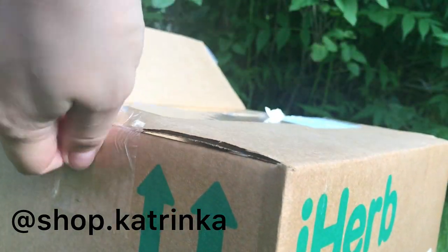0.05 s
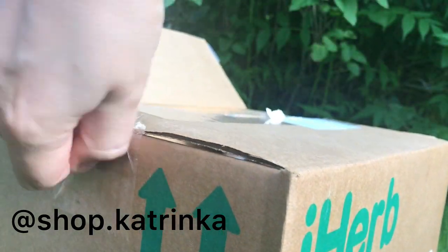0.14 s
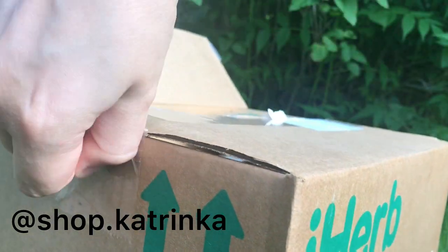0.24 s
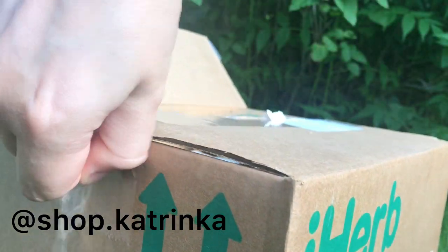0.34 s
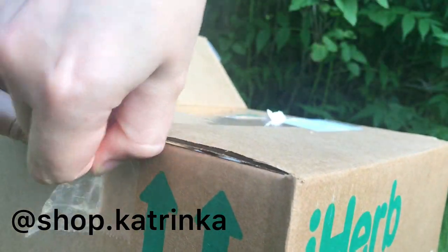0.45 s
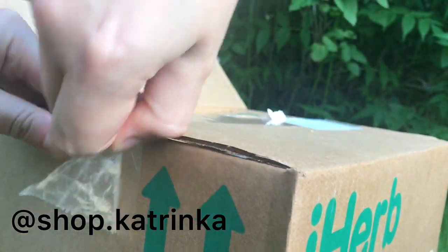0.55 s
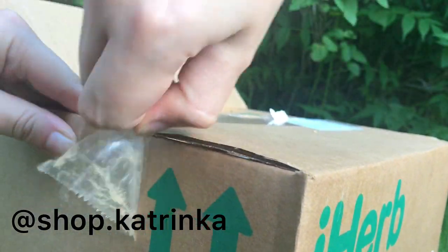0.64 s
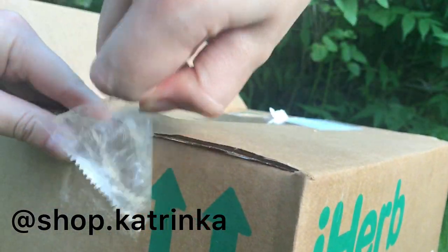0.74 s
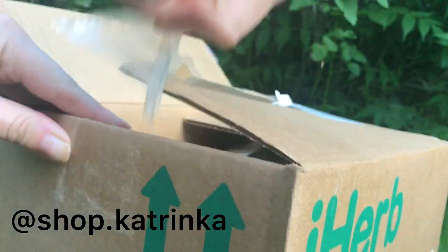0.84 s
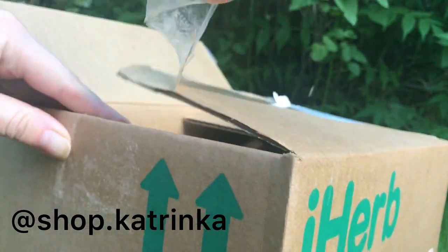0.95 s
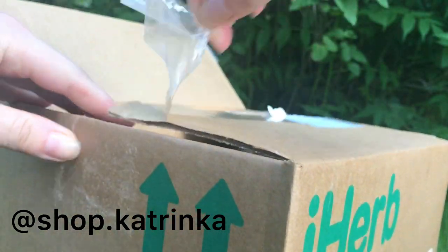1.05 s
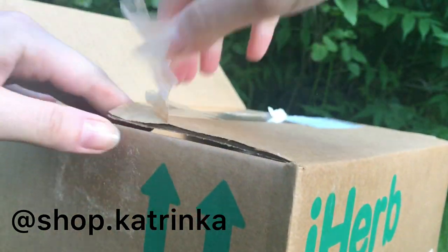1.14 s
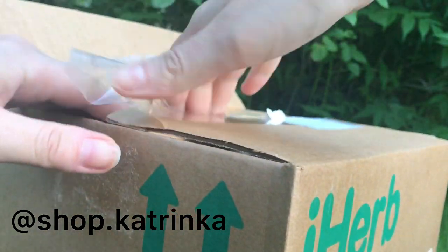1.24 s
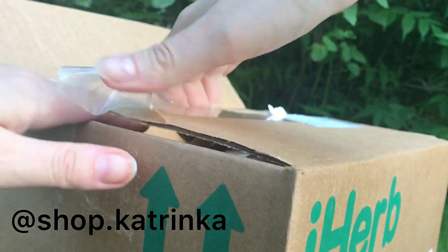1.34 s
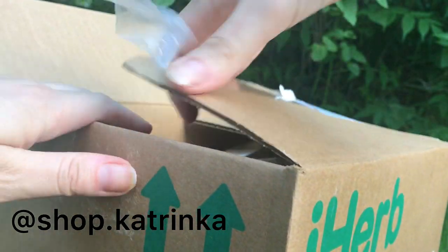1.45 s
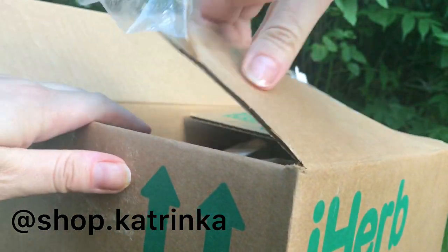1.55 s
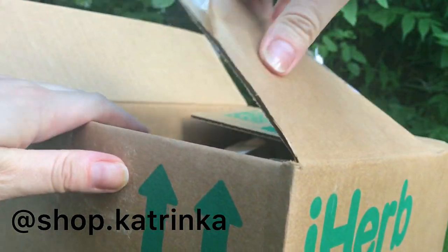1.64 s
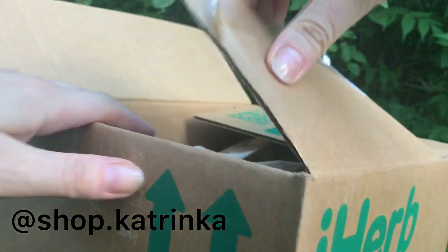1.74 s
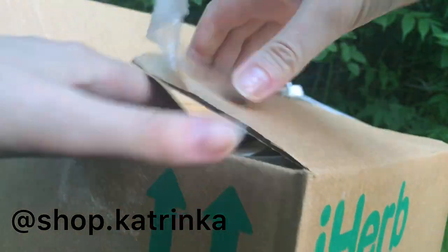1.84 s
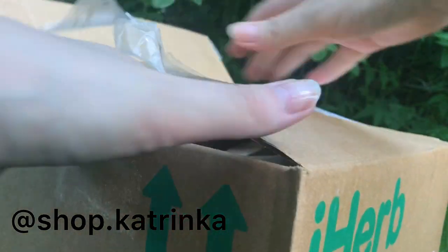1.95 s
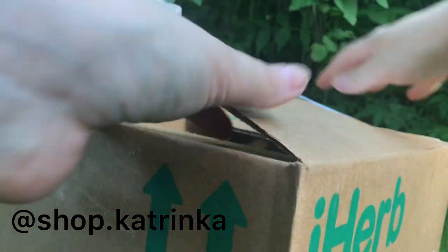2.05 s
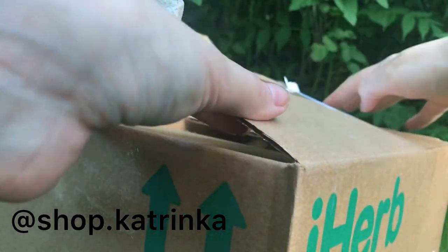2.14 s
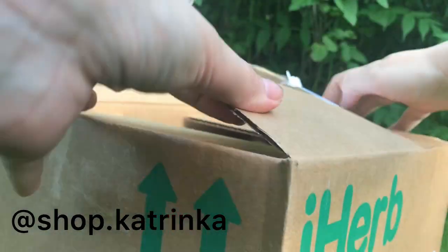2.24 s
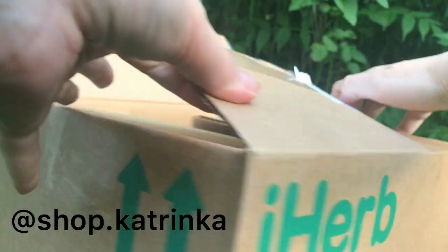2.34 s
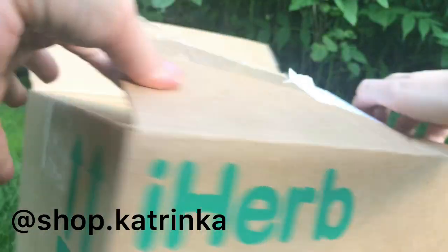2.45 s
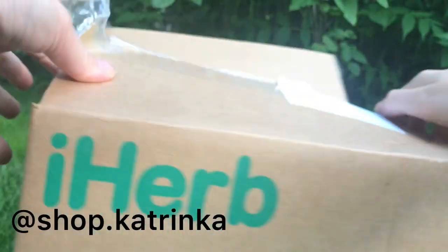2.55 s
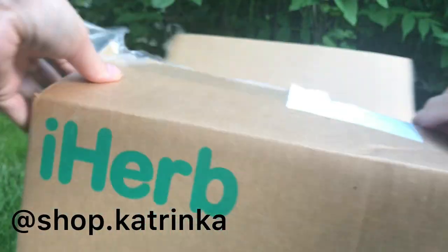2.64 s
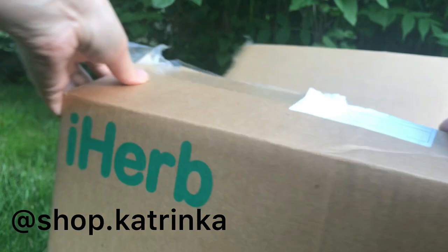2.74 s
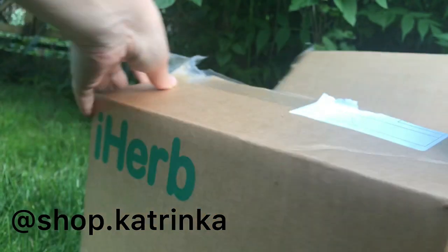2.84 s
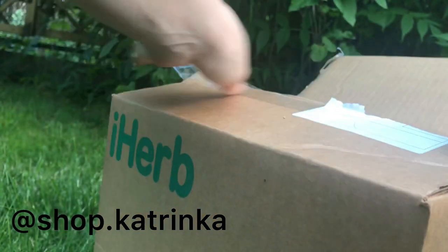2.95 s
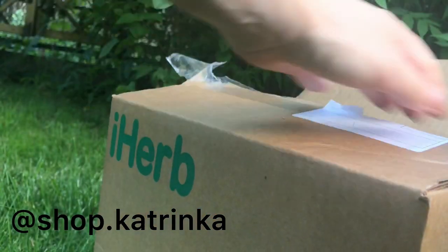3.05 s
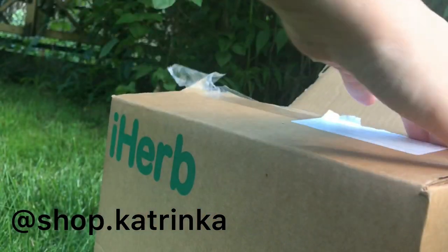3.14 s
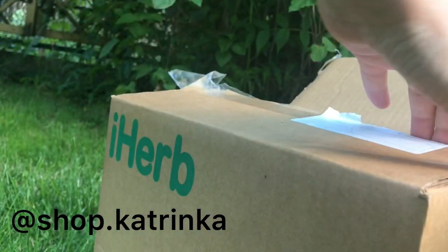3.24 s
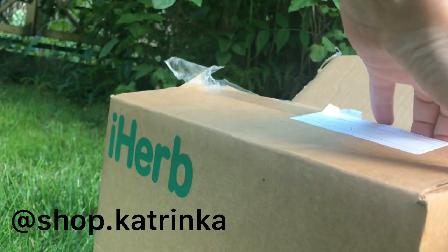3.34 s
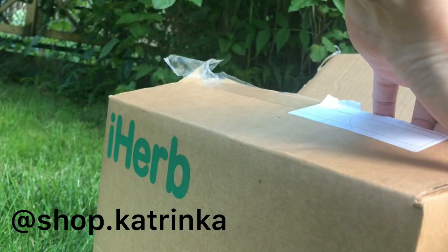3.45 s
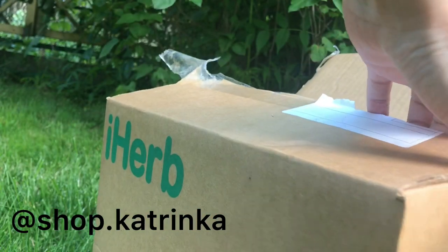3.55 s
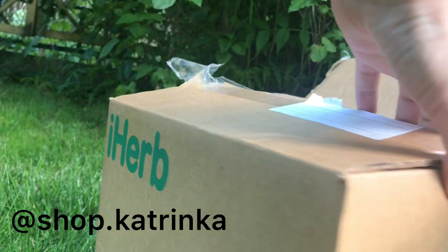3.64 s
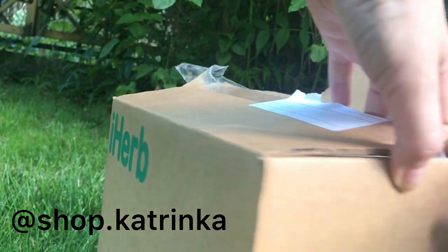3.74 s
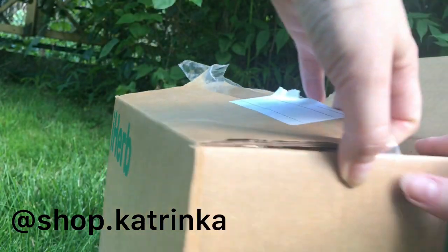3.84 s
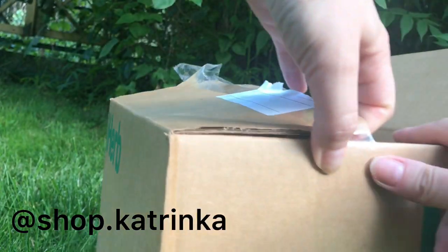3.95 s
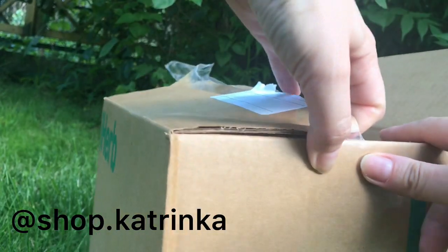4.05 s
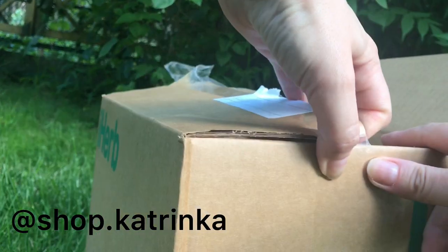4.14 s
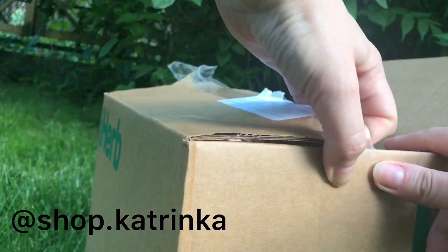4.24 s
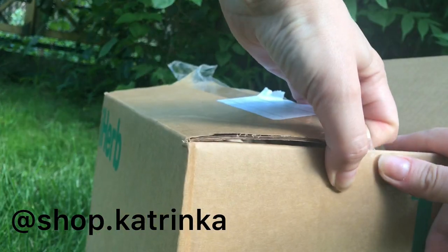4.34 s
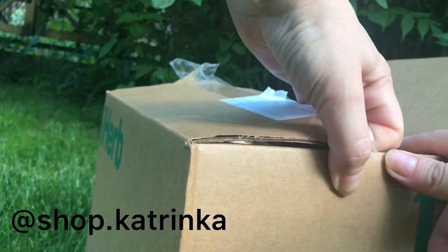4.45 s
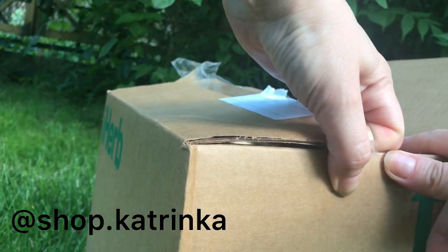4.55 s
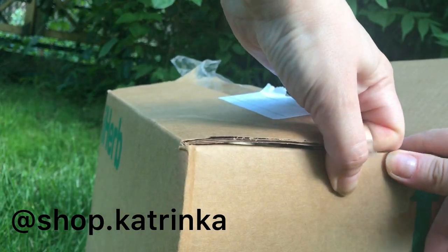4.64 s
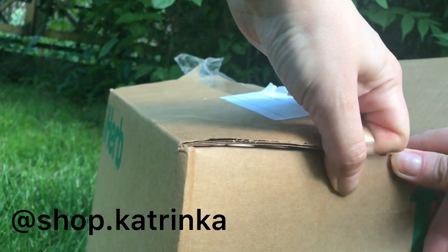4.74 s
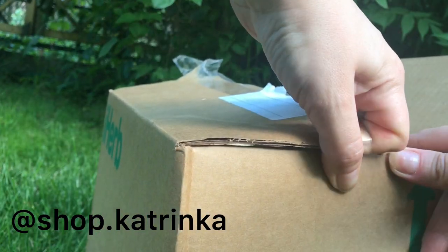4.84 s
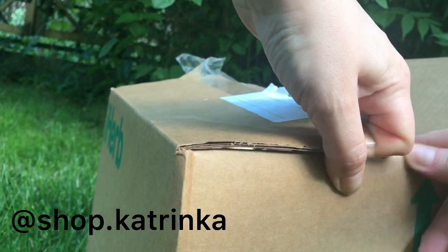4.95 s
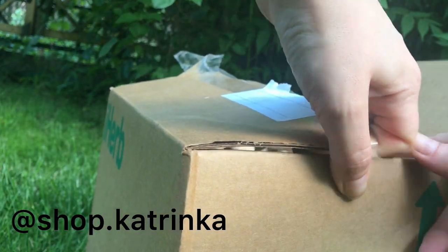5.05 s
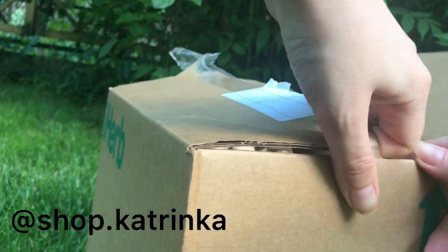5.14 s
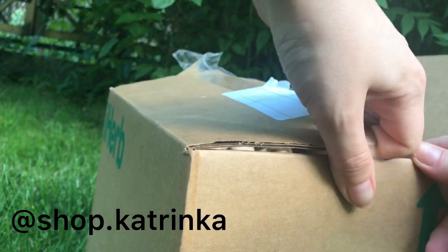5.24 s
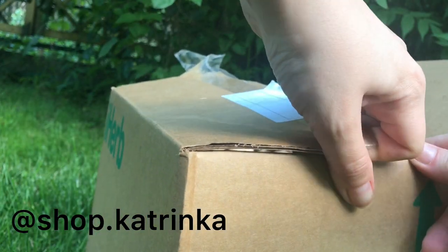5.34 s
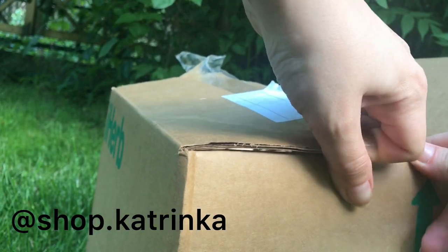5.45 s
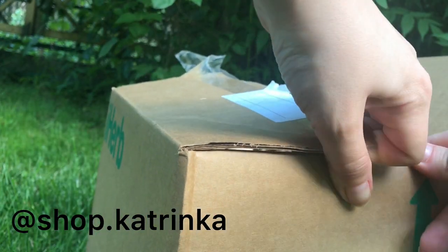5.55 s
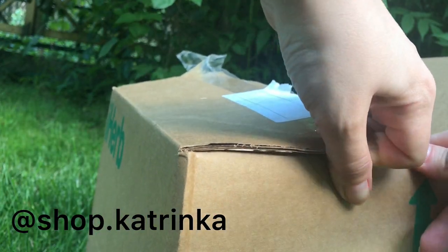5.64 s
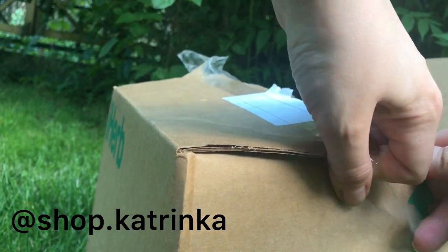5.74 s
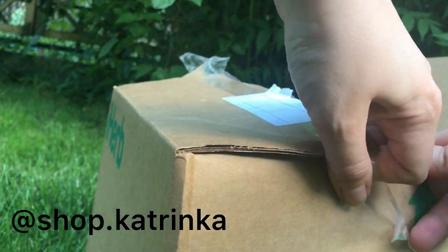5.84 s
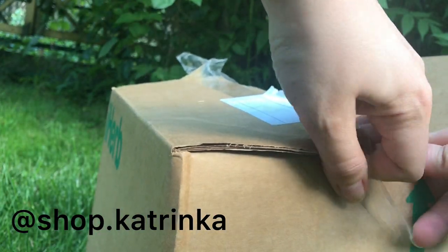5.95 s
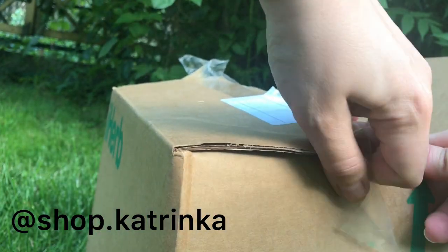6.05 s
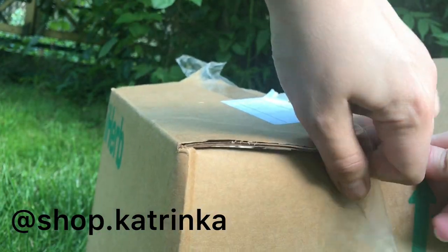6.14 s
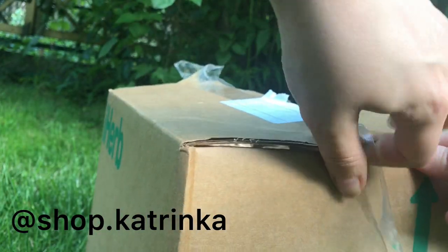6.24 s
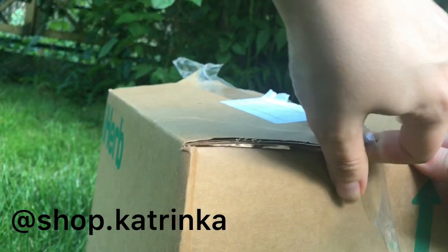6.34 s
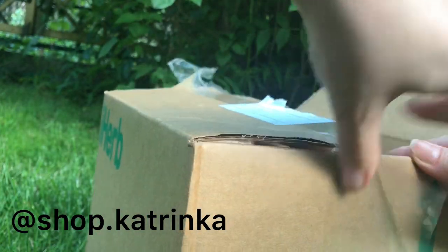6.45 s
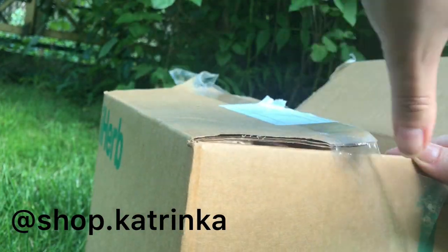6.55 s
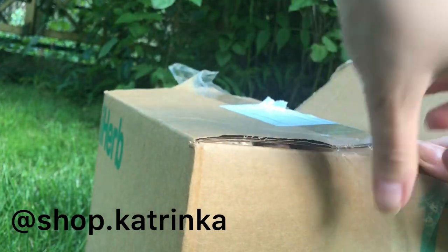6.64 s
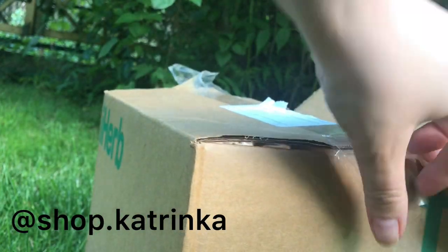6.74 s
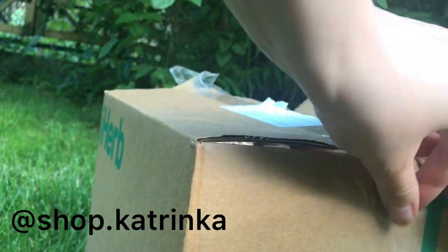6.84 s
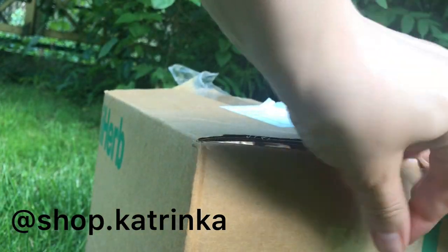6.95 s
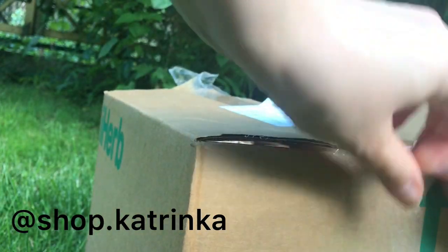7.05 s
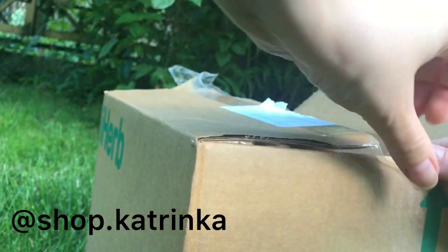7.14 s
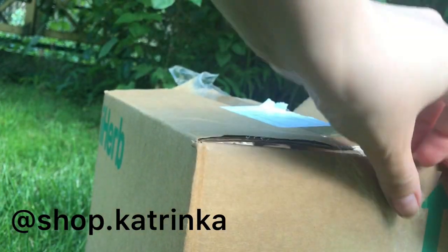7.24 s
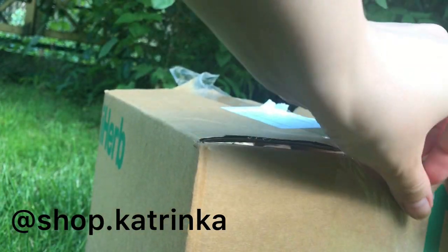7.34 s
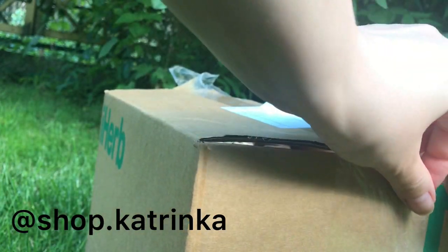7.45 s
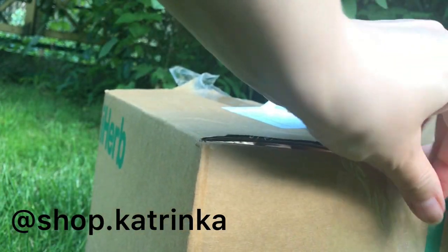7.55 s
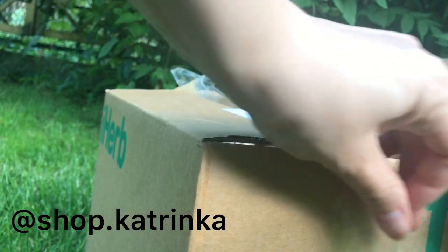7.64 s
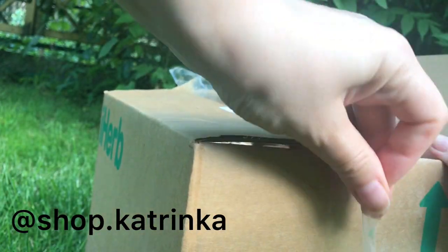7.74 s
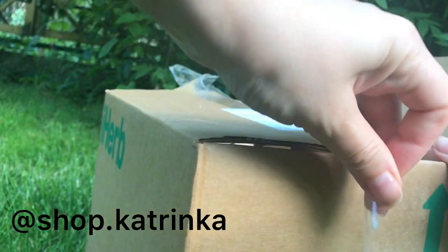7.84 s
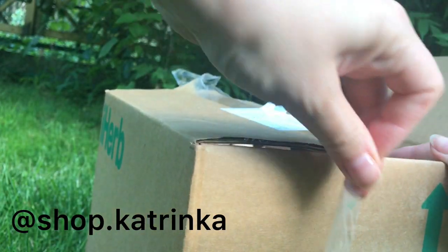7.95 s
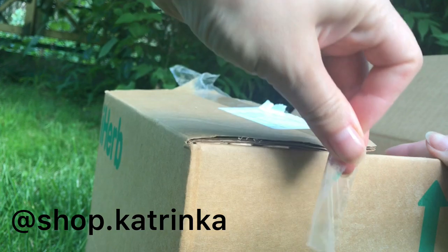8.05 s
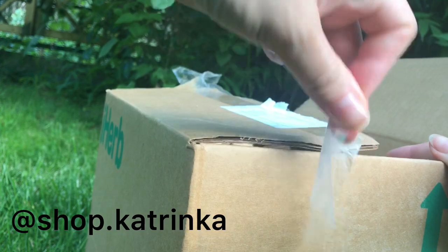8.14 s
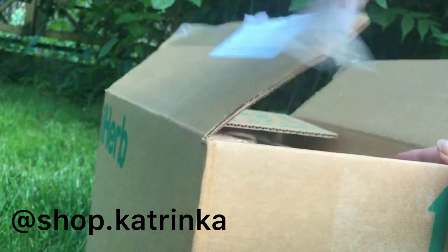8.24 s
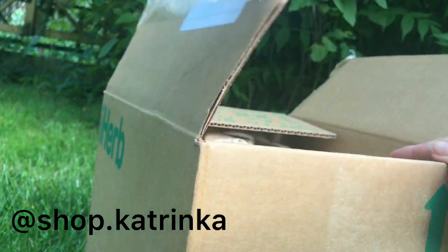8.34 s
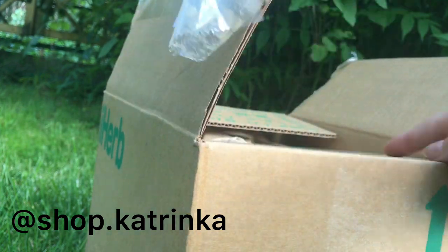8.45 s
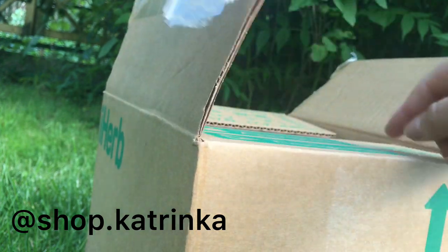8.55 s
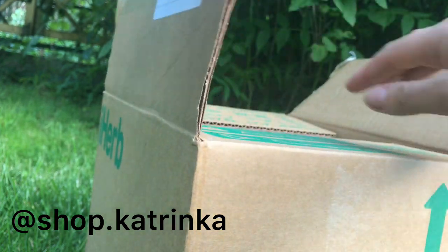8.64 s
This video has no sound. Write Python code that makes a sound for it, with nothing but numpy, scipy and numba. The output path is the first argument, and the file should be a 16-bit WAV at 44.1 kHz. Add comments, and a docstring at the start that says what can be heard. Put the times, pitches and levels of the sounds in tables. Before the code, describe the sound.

Close, dry sticky-tape rips and snaps thump a cardboard box, then soft hand slides, a creak and fiddly crackles lead to one last rip.

```python
"""Peeling packing tape from a cardboard box

Tape is picked at, peeled and ripped off a box in a garden, close to the microphone.
Stick-slip of the glue excites the freed strip, whose moving resonances are filtered from random clicks.
Snaps are shaped noise bursts; jolts ring decaying panel modes; a flap whips with a falling note.
Between the pulls, filtered grain makes hands slide over the board, loose tape crinkle and a wall creak.
Filtered noise is the outdoor air."""
import sys
import numpy as np
from scipy import signal
from scipy.fft import rfft, irfft
from scipy.io import wavfile
from scipy.ndimage import uniform_filter1d
from numba import njit

SR = 44100
rng = np.random.default_rng(int(sys.argv[2]) if len(sys.argv) > 2 else 0)


def master_out(mix):
    """Clip the mix to full scale and print it as 16-bit PCM to the path in sys.argv[1]."""
    frames = np.transpose(np.atleast_2d(mix))
    ceiling = np.clip(frames, -1, 1)
    pcm = np.round(ceiling * 32767).astype(np.int16)
    wavfile.write(sys.argv[1], SR, pcm)


N = 383669  # length [samples]
SPLIT_HZ = 7000  # start of the treble
TOP_HZ = 15750  # upper limit of the microphone and of the popping notes
WAVER_PER_S = 30  # changes of the uneven force


def undb(db):
    """Logarithmic level: decibels to amplitude gain."""
    return 10 ** (np.asarray(db) / 20)


def unit(x):
    """Normalization: scale to rms 1."""
    return x / np.sqrt(np.mean(x ** 2))


def curves(rows):
    """Linear interpolation: the columns of a table, joined by straight lines in time."""
    s, *columns = np.transpose(rows)
    return [np.interp(np.arange(N) / SR, s, c) for c in columns]


def colour(x, points):
    """Minimum-phase filtering: a causal response with the given (frequency [Hz], gain [dB]) outline."""
    size = 4096
    hz, db = np.transpose(points)
    bins_hz = np.arange(size // 2 + 1) * SR / size
    gain = undb(np.interp(np.log(bins_hz + 1), np.log(hz), db))
    # folding the cepstrum onto positive time makes the response causal
    cepstrum = irfft(np.log(gain))
    cepstrum[1:size // 2] *= 2
    cepstrum[size // 2 + 1:] = 0
    response = irfft(np.exp(rfft(cepstrum)))
    return signal.fftconvolve(x, response)[:len(x)]


def hump(x, hz, depth_db):
    """Broad resonance: the response has fallen by depth_db one octave from its centre."""
    octaves = np.arange(-4, 5)
    return colour(x, np.transpose([hz * 2. ** octaves, -depth_db * np.abs(octaves) ** 1.07]))


def split(x):
    """Complementary crossover: the parts below and above the start of the treble sum flat."""
    halves = [signal.butter(N=2, Wn=SPLIT_HZ, btype=kind, fs=SR, output="sos") for kind in ("low", "high")]
    return [signal.sosfilt(sos, signal.sosfilt(sos, x)) for sos in halves]


def walk(rate):
    """Random modulation: levels held 1 / rate seconds, slewed and scaled to rms 1."""
    hold = max(int(SR / rate), 2)
    levels = rng.standard_normal(N)[np.arange(N) // hold]
    return unit(uniform_filter1d(levels, hold))


def steady(x):
    """Automatic levelling: hold the rms near 1 over a twelfth of a second, keeping the finer grain."""
    power = np.abs(uniform_filter1d(x ** 2, SR // 12))
    return x / np.sqrt(power + np.mean(x ** 2) / 10 ** 2)


def slips(rate, spread_db, flicker_db, flicker_rate):
    """Stick-slip friction: clicks of very unequal size that come in bunches."""
    clicks = (rng.random(N) < rate / SR) * rng.choice([-1, 1], N)
    size_db = spread_db * np.minimum(rng.standard_normal(N), 2)
    return clicks * undb(size_db + flicker_db * walk(flicker_rate))


def scatter(x, t60, db):
    """Diffuse reflection: add a dense short tail with a decay time of t60 seconds."""
    t = np.arange(SR // 4) / SR
    tail = rng.standard_normal(len(t)) * np.exp(-np.log(1000) * t / t60)
    return x + undb(db) * signal.fftconvolve(x, tail / np.linalg.norm(tail))[:len(x)]


def add(out, s, x):
    """Superposition: mix x into out at time s."""
    i = max(int(s * SR), 0)
    out[i:i + len(x)] += x[:max(N - i, 0)]


@njit
def resonator(x, hz, damping):
    """Damped oscillator: a moving state-variable filter gives band-pass and high-pass outputs."""
    band, high, b, l = np.empty(len(x)), np.empty(len(x)), 0., 0.
    for i in range(len(x)):
        g = np.tan(np.pi * min(hz[i] / SR, .45))
        v = (b + g * (x[i] - l)) / (1 + g * (g + damping))
        low = l + g * v
        b, l = 2 * v - b, 2 * low - l
        band[i], high[i] = damping * v, x[i] - damping * v - low
    return band, high


def pops(rate, hz, spread_db, decay_s):
    """Impulsive excitation: separate film pops, each a ringing note near hz over a burst of grit."""
    out, t = np.zeros(N), np.arange(SR // 100) / SR
    count = int(rate * N / SR)
    starts = rng.integers(0, N, count)
    variations = np.clip(rng.standard_normal((count, 3)), -2, 2)
    for i, (size, length, pitch) in zip(starts, variations):
        pop_hz = min(hz[i] * 2 ** (.7 * pitch), TOP_HZ)
        note = np.sin(2 * np.pi * pop_hz * t)
        fall = np.exp(-t / (decay_s * 2 ** (length / 2)))
        grit = rng.standard_normal(len(t)) * np.sqrt(2) * fall
        add(out, i / SR, undb(spread_db * size) * (note + grit) * fall)
    return unit(out)


def cracks(rows, rise_s, decay_s, tail_s, tail_db, depth_db, size_law):
    """Fracture: a crack builds, bursts and shivers; with size_law 1, duller ones last longer."""
    out, lead = np.zeros(N), 1 / 100
    for s, db, hz in rows:
        # the time constants hold as given at SPLIT_HZ, or at any pitch when size_law is 0
        t = (np.arange(SR // 14) / SR - lead) * (hz / SPLIT_HZ) ** size_law
        fall = np.exp(-np.abs(t) / decay_s) + undb(tail_db) * np.exp(-np.abs(t) / tail_s)
        burst = np.where(t < 0, np.exp(-np.abs(t) / rise_s), fall)
        crack = hump(rng.standard_normal(len(t)) * burst, hz, depth_db)
        peak = np.sqrt(uniform_filter1d(crack ** 2, SR // 1000).max())
        add(out, s - lead + 0.00105, undb(db) * crack / peak)
    return out


def hand_echo(x, lag_s, share):
    """Comb filtering: the moving hand reflects the sound, giving peaks that wander."""
    n = np.arange(N)
    lag = lag_s * SR * np.exp(0.51 * walk(8.3))
    return x + share * np.interp(n - lag, n, x)


def strokes(rows, attack_share, release_s):
    """Force envelope: take hold, swell or fade, let go; gains for main band, treble and drag."""
    gains = np.zeros((3, N))
    for start, length, db, swell_db, treble_db, drag_db in rows:
        t = np.arange(int(length * SR) + SR // 4) / SR
        attack = np.sin(np.pi / 2 * np.minimum(t / (attack_share * length), 1)) ** 2
        release = np.exp(-np.maximum(t - length, 0) / release_s)
        swell = undb(swell_db * (np.minimum(t / length, 1) - .5))
        shape = attack * release * swell
        for gain, band_db in zip(gains, (db, db + treble_db, drag_db)):
            # overlapping strokes add in power
            add(gain, start, (undb(band_db) * shape) ** 2)
    return np.sqrt(gains)


# outdoor noise spectrum: (frequency [Hz], gain [dB])
GARDEN_SPECTRUM = [(18, -15), (30, -5), (131, -1.5), (415, -23), (822, -21), (1590, -24.5), (9460, -37.5),
                   (16000, -39)]


def garden():
    """Broadband ambient noise: faint outdoor air, swelling slowly."""
    level_db = -51.5 + 1.0 * walk(3.16)
    return unit(colour(rng.standard_normal(N), GARDEN_SPECTRUM)) * undb(level_db)


# modes of the box at pitch factor 1: (frequency [Hz], relative level [dB], decay time t60 [s])
BOX_MODES = [(125.8, -11, 0.11), (171.5, 6.5, 0.042), (202.5, 6, 0.039), (231, 1.5, 0.026),
             (452.4, -13, 0.041), (561, -3, 0.023), (607, -13.5, 0.051)]


def box_ring(pitch, lag_s=0.0034, rise_s=0.0081):
    """Modal decay with dispersion: bending waves are slower at low pitch, so the boom comes last."""
    t, out = np.arange(SR // 5) / SR, 0
    for hz, db, t60 in BOX_MODES:
        age = np.maximum(t - lag_s * np.sqrt(BOX_MODES[1][0] / hz), 0)
        envelope = (1 - np.exp(-age / rise_s)) * np.exp(-np.log(1000) * age / t60)
        out = out + undb(db) * np.sin(2 * np.pi * hz * pitch * age) * envelope
    return out / np.abs(out).max()


RUMBLE_DB, SCUFF_DB = -1, -7.5  # panels and ribs, relative to the drag
HOLD_DB = -54.5  # drag of the hand that steadies the box
TAPS_PER_S, TAP_HZ, TAP_DB = 35, 900., -12  # fingertips; nominal pitch, level relative to the drag
# spectrum of the ribbed board: (frequency [Hz], gain [dB])
BOARD_SPECTRUM = [(200, -11), (360, -0.5), (500, 0), (680, 3), (850, -9), (1100, -1), (1500, -11.5),
                  (4000, -14), (12000, -19.5)]


def board(drag):
    """Friction-driven vibration: judder rumbles the panels, scuffs the ribs and taps the board lightly."""
    judder = slips(700, spread_db=2, flicker_db=3.0, flicker_rate=55)
    panels = signal.fftconvolve(judder, box_ring(0.96))[:N]
    panel_outline = [(50, 2.5), (90, -0.5), (160, -6), (260, 1.0), (400, 1.0), (1500, -41.0)]
    rumble = steady(colour(panels, panel_outline))
    ribs = slips(1800, spread_db=2.0, flicker_db=3.0, flicker_rate=90)
    scuff = steady(colour(ribs, BOARD_SPECTRUM))
    taps = pops(TAPS_PER_S, np.full(N, TAP_HZ), spread_db=3.5, decay_s=.0016)
    taps = unit(hump(taps, TAP_HZ, depth_db=4))
    force = np.hypot(drag, undb(HOLD_DB))
    return force * (undb(RUMBLE_DB) * rumble + undb(SCUFF_DB) * scuff) + drag * undb(TAP_DB) * taps


# tugs at the tape: (start [s], length [s], relative level [dB], swell from start to end [dB],
# sizzle above 7 kHz before its trim, relative [dB], drag on the box [dB])
TUGS = [(.095, 0.23, -40, 12.5, -2.5, -56.5), (.365, 0.1, -25, -7, -6.5, -40),
        (.47, 0.26, -33.5, 2.5, 2.5, -46.5), (.75, 0.074, -31.5, 19.5, 2, -40),
        (.888, 0.099, -39.5, -0.5, 10.5, -39), (4.572, 0.11, -52, -6, 7, -53),
        (4.69, 0.12, -62, 5.5, 8, -38.5), (4.91, 0.13, -59.5, 9, 8, -49),
        (5.095, 0.034, -47, 8, 1.5, -32.5), (5.285, 0.086, -55.5, -3, 10.5, -37.5),
        (5.445, 0.11, -53.5, 5, 14, -43), (5.58, 0.29, -57.5, 8.5, 10.5, -47.5),
        (5.845, 0.19, -40.5, -2, -0.5, -63), (6.02, 0.11, -44.5, -3, 1, -39),
        (6.115, 0.045, -34, 8.5, 3.5, -39.5), (6.18, 0.14, -49.5, -0.5, 2, -35.5),
        (7.555, 0.19, -40, -8.5, -3, -44.5), (7.745, 0.34, -40.5, -4, 3, -43.5),
        (7.99, 0.252, -39.5, 19, 5.5, -41)]


def tugs():
    """Adhesive loading: the glue takes the load, then the strip goes slack; the force wavers."""
    return strokes(TUGS, attack_share=0.069, release_s=0.017) * undb(1 * walk(WAVER_PER_S))


CRACKLE_PER_S, CRACKLE_DB = 170, -2  # whole beads of glue giving way; relative to fine slips, slow peel
FAST_PEEL_DB = -32.5  # above this level the beads merge into the rip
STRIP_RING_DB = -2  # overtones relative to the raw slips
# the freed strip: (time [s], lowest resonance before wavering [Hz], glue slips [1/s],
# ring of that resonance before a 6 dB lift [dB])
FREED_STRIP = [(.1, 2860, 2500, -23), (.35, 2700, 690, -16), (.4, 2220, 2500, -27.5),
               (.56, 1700, 2600, -7.5), (.83, 1300, 4000, 2), (.95, 1580, 3900, 2), (4.55, 3600, 1000, -12),
               (5.74, 3640, 2600, -15), (5.772, 2310, 3100, 2), (5.81, 1380, 6000, -26),
               (6.3, 1090, 1030, -21.5), (7.6, 1124, 2400, 3.5), (7.78, 1325, 2200, 8.5),
               (8.24, 1130, 9700, -0.5)]
# spectrum of the film: (frequency [Hz], gain [dB])
FILM_SPECTRUM = [(300, 2), (1000, 0), (3750, 5), (4700, 1.5), (5700, 4), (10000, -0.5), (16000, 0.5)]
# sudden runs of the peel: (start [s], length [s], level [dB])
PEEL_RUNS = [(0.347, 0.03, -34), (0.525, 0.046, -42), (5.745, 0.055, -13), (5.79, 0.043, -23.5)]


def tape(gain, sizzle_gain):
    """Stick-slip and resonance: glue slips ring the strip, which radiates little below its lowest mode."""
    hz, rate, ring_db = curves(FREED_STRIP)
    # the tension wavers
    hz = hz * (1 + .03 * walk(20))
    fine_slips = slips(rate, spread_db=3.5, flicker_db=2.2, flicker_rate=260)
    beads = pops(CRACKLE_PER_S, 2 * hz, spread_db=4, decay_s=.0005)
    beads = beads / (1 + gain / undb(FAST_PEEL_DB))
    glue = unit(fine_slips) + undb(CRACKLE_DB) * beads
    # a little of each slip goes straight into the board, below the strip's range
    film = resonator(glue, hz, .42)[1] - undb(-19) * glue
    lowest = resonator(resonator(glue, hz, .25)[0], hz, .25)[0]
    film = film + undb(ring_db + 6) * lowest
    for k in range(2, 8):
        # the overtones come and go as the strip twists
        level = undb(STRIP_RING_DB + 3.5 * walk(40))
        overtone_hz = k * hz * (1 + .04 * walk(14))
        film = film + level * resonator(glue, overtone_hz, .1 / np.sqrt(k))[0]
    film = hand_echo(film, lag_s=0.000383, share=0.28)
    body, sizzle = (steady(part) for part in split(colour(film, FILM_SPECTRUM)))
    runs = np.zeros(N)
    for s, length, db in PEEL_RUNS:
        add(runs, s, undb(db) * signal.windows.hann(int(length * SR)))
    # in a fast run the slips merge into one continuous tear
    tear = body + undb(-2.5) * sizzle
    tear = tear / np.sqrt(np.abs(uniform_filter1d(tear ** 2, SR // 200)) + 1 / 20)
    peel = undb(-1.0) * (body * gain + undb(2.0) * sizzle * sizzle_gain)
    return peel + runs * tear


# the glue lets go all at once: (time [s], relative peak level [dB], brightest frequency [Hz])
GLUE_SNAPS = [(0.3692, 5.5, 2670), (.3932, -8, 4600), (.404, -7, 3630), (.4262, -9, 2700),
              (.4592, -8, 3020), (.5492, -5.5, 6530), (0.6142, 0, 8150), (0.8435, 2, 1900),
              (4.7757, -9.5, 7200), (5.1421, -5.5, 3480), (5.757, 2.5, 9000), (6.4075, -19.5, 2400),
              (6.4975, -6.5, 9700), (7.7612, -1, 1740), (7.8715, 5.5, 3670), (7.929, -8, 1540),
              (8.032, -6.5, 3020), (8.0541, -6, 11500), (8.08, -14, 1610), (8.2516, 2, 6060)]
# creases of the film click over: (time [s], relative peak level [dB], brightest frequency [Hz])
CREASE_TICKS = [(.2897, -24, 3920), (.3085, -12, 6100), (.3168, -26, 3750), (.3465, -15, 3800),
                (.5706, -11.5, 3000), (.6235, -7, 8000), (.7304, -10, 4130), (1.0809, -22, 5000),
                (1.2316, -19, 8290), (1.2534, -18.5, 6500), (1.4414, -20.5, 3330), (1.8622, -13, 12000),
                (1.8826, -3, 11200), (2.9185, 3, 10300), (2.9587, -10.5, 9450), (3.0037, -9.5, 3330),
                (3.2321, -23.5, 3120), (3.4535, -13.5, 6850), (3.6226, -9.5, 9600), (3.9748, -22.5, 5000),
                (4.4248, -25, 15000), (4.584, -13, 14000), (5.3492, -17, 11100), (5.4058, -13, 2350),
                (5.688, -13, 9000), (5.7174, -14.5, 9270), (6.8095, -14.5, 7100), (7.3335, -24, 11000),
                (7.4196, -20.5, 2660), (7.4415, -24, 6850), (7.5584, -18.5, 4090), (8.3035, -17, 5000),
                (8.3123, -14.5, 8260), (8.3182, -12, 8520), (8.3367, -21, 5410), (8.357, -19, 4050),
                (8.5437, -22, 5410)]


def snaps():
    """Sudden energy release: glue tears in a few milliseconds; a crease of the film clicks much faster."""
    tears = undb(-11.5) * cracks(GLUE_SNAPS, rise_s=0.0007, decay_s=0.0015, tail_s=0.005,
                                 tail_db=-12, depth_db=3.5, size_law=0)
    clicks = undb(-14) * cracks(CREASE_TICKS, rise_s=.0003, decay_s=.0004, tail_s=.0022,
                                tail_db=-17, depth_db=3, size_law=1)
    # the film is stuck to the board, which knocks along with each click
    knock = colour(scatter(clicks, t60=0.027, db=8.0), BOARD_SPECTRUM)
    return tears + clicks + undb(-5.5) * knock


# jolts of the box: (time [s], peak level [dB], panel stiffness as a pitch factor [ratio])
BOX_JOLTS = [(0.369, -15.5, 1.04), (.847, -7.5, 1.09), (1.173, -24.5, 0.58), (1.312, -26.5, 0.88),
             (1.738, -30, 1), (2.567, -22.5, 0.96), (2.668, -25.5, 1.03), (2.956, -24.5, 1.36),
             (4.776, -9, 0.92), (5.298, -23, 1.2), (5.759, -16, 0.97), (6.406, -21.5, 1.5),
             (6.423, -25, 1.02), (6.496, -19.5, 1.08), (7.29, -29.5, 0.89), (7.759, -20.5, 1.25),
             (7.87, -12.5, 1.11), (7.926, -23.5, 0.78), (8.2594, -9.5, 0.68), (8.28, -20.5, 0.7)]


def thumps():
    """Impulse response: the panels spring back when the tape gives way or a hand lands."""
    out = np.zeros(N)
    for s, db, pitch in BOX_JOLTS:
        add(out, s, undb(db) * box_ring(pitch))
    return out


WHIP_START_HZ = 453  # start above the final pitch
WHIP_FALL_S, WHIP_DECAY_S = 0.002, 0.0094  # time constants of pitch and level
# a flap springs free: (time [s], peak level [dB], final pitch before its flutter [Hz])
FLAP_WHIPS = [(.8445, -16.5, 574), (8.253, -14, 540)]


def whips():
    """Dispersion: the short bending waves of a freed flap arrive first, so its unsteady note drops."""
    out, t = np.zeros(N), np.arange(SR // 12) / SR
    for s, db, low_hz in FLAP_WHIPS:
        glide_hz = low_hz + WHIP_START_HZ * np.exp(-t / WHIP_FALL_S)
        hz = glide_hz * np.exp(.3 * walk(900)[:len(t)])
        note = np.sin(2 * np.pi * np.cumsum(hz) / SR)
        add(out, s, undb(db) * note * np.exp(-t / WHIP_DECAY_S))
    return out


# short scrapes and knocks of the flaps: (start [s], length [s], relative level [dB], centre [Hz])
FLAP_SCRAPES = [(0.85, 0.019, -37, 600), (1.094, 0.029, -45.5, 1020), (1.328, 0.057, -50, 794),
                (2.291, 0.061, -50, 720), (3.095, 0.09, -41.5, 1010), (4.778, 0.021, -35, 900),
                (5.305, 0.021, -40.5, 940), (5.445, 0.06, -47, 910), (6.406, 0.011, -31, 520),
                (6.425, .016, -37.5, 520), (6.494, 0.04, -33, 517), (8.076, 0.022, -31, 630),
                (8.262, 0.044, -38.5, 785)]


def scrapes():
    """Friction over a ribbed surface: a flap edge catches and grates over the flutes, dying away."""
    out, grit = np.zeros(N), slips(3000, spread_db=3, flicker_db=2, flicker_rate=500)
    for s, length, db, hz in FLAP_SCRAPES:
        i, n = int(s * SR), int(length * SR)
        u = np.arange(n) / n
        envelope = np.minimum(u / 0.11, 1) * (1 - u) ** 1.08
        stroke = np.pad(grit[i:i + n] * envelope, (0, SR // 50))
        ring = hump(stroke, hz, depth_db=8)
        add(out, s, undb(db - 1.0) * ring * np.sqrt(n / np.sum(ring ** 2)))
    return out


# spectrum of rubbing skin: (frequency [Hz], gain [dB])
SKIN_SPECTRUM = [(590, -36), (1000, 6), (2100, 3), (4000, 2), (4900, -1), (9300, -1), (15100, -7),
                 (16000, -14)]


def rubbing(grain, gain, treble_gain):
    """Friction noise: give a grain the colour of rubbing, with separate main band and treble levels."""
    hiss, treble = (unit(part) for part in split(colour(grain, SKIN_SPECTRUM)))
    return undb(-4.5) * hiss * gain + undb(-5.0) * treble * treble_gain


SLIDE_ATTACK_SHARE, SLIDE_RELEASE_S = 0.22, 0.022  # the hand lands over this share of a stroke; it lifts
# fingers work the loose tape: (start [s], length [s], relative level [dB],
# swell from start to end [dB], treble before its trim, relative [dB], drag on the box [dB])
TAPE_RUSTLES = [(0.99, 0.11, -50.5, -9, 7, -45.5), (4.3, 1.17, -60, -11.5, 6.5, -49),
                (5.35, 0.47, -58, -12, 12, -46.5), (6.67, 0.16, -57, 8, -16, -49),
                (8.265, 0.12, -48.5, -5, 5, -55), (8.39, 0.19, -54, -15, 4.5, -51)]


def rustle_strokes():
    """Force envelope: fingers take hold of the loose tape and let go."""
    return strokes(TAPE_RUSTLES, SLIDE_ATTACK_SHARE, SLIDE_RELEASE_S)


def loose_tape(gain, treble_gain):
    """Crease buckling: each crinkle has a colour of its own, over the soft hiss of the fingers."""
    creases = pops(120, np.full(N, 6000.), spread_db=5.5, decay_s=.0005)
    return rubbing(steady(creases + .35 * rng.standard_normal(N)), gain, treble_gain)


# strokes of a hand over the board: (start [s], length [s], relative level [dB],
# swell from start to end [dB], treble before its trim, relative [dB], drag on the box [dB])
HAND_SLIDES = [(1.11, 0.17, -55, 8, 3, -50), (1.29, 0.081, -48.5, 4, -8, -48),
               (1.435, 0.2, -51.5, -3, 4.5, -50), (1.68, 0.068, -48, 1.5, -8, -39),
               (1.8, 0.064, -39.5, 7.5, -3, -39), (1.875, 0.076, -45, -2, 0.5, -45),
               (1.98, 0.11, -52, 11, -2.5, -56.5), (2.27, 0.16, -49.5, 17, 2, -53),
               (2.39, 0.62, -39, -5.5, 1, -42), (3.09, 0.075, -42.5, -13, 5, -39),
               (3.365, 0.18, -50, -5, 2.5, -44), (3.54, 0.36, -44, 0.5, 3.5, -37),
               (3.9, 0.54, -58.5, -13, 3, -40), (6.405, 0.077, -45.5, 10, 2, -39.5),
               (6.878, 0.03, -49.5, -8, 5, -60), (6.92, 0.072, -50.5, 7.5, -11, -58),
               (7.288, 0.021, -48.5, -20, 0.5, -51), (7.32, 0.028, -43.5, -11, -11, -39)]


def slide_strokes():
    """Force envelope: the hand lands, strokes with a wavering force and lifts."""
    return strokes(HAND_SLIDES, SLIDE_ATTACK_SHARE, SLIDE_RELEASE_S) * undb(0.8 * walk(WAVER_PER_S))


def hands(gain, treble_gain):
    """Dense micro-impacts: skin hisses evenly over paper fibres."""
    fibres = slips(9000, spread_db=3, flicker_db=1.5, flicker_rate=150)
    return rubbing(hand_echo(fibres, lag_s=0.000303, share=0.32), gain, treble_gain)


# taps on the board: (time [s], relative peak level [dB], centre [Hz])
BOARD_KNOCKS = [(1.721, -30, 670), (1.742, -24.5, 716), (2.57, -30, 606), (2.669, -29.5, 650),
                (4.1125, -21, 513), (4.13, -27, 600), (6.238, -27.5, 990), (6.309, -31, 1000)]


def knocks():
    """Damped impact response: fingers and flap edges tap the board, which answers short and hollow."""
    return undb(-5) * cracks(BOARD_KNOCKS, rise_s=.0004, decay_s=.0025, tail_s=.007,
                             tail_db=-14, depth_db=11, size_law=0)


# squeaks: (start [s], length [s], level [dB], lower resonance [Hz])
SKIN_SQUEAKS = [(2.282, 0.036, -50, 1960), (6.879, .045, -46.5, 5960), (7.415, 0.013, -47, 2500)]


def squeaks():
    """Resonant friction: skin or tape catches and sings in two close resonances."""
    out = np.zeros(N)
    for s, length, db, hz in SKIN_SQUEAKS:
        grit = rng.standard_normal(int(length * SR))
        ring = sum(resonator(grit, np.full(len(grit), ratio * hz), .07)[0] for ratio in (1., 1.27))
        add(out, s, undb(db) * unit(ring * signal.windows.tukey(len(grit))))
    return out


CREAK_CLICK_DB = -13.5  # dry click of each slip, relative to the wall
# a fingertip judders along the wall: (time [s], level [dB], mean slips [1/s])
WALL_CREAK = [(4.0, -57, 67), (4.12, -37.5, 78), (4.2, -46, 110), (4.28, -43, 100), (4.35, -47, 87),
              (4.42, -49, 91), (4.5, -59, 59)]
# resonances of the creaking wall: (frequency [Hz], width [Hz], relative level [dB])
WALL_MODES = [(595, 250, 6), (750, 220, -6), (1170, 380, -17), (2010, 380, -12.5), (2600, 870, -16)]


def creak():
    """Stick-slip excitation: uneven pulses, each a dry click and burst of grit, ring a cardboard wall."""
    db, rate = curves(WALL_CREAK)
    t = np.arange(N) / SR
    cycles = np.cumsum(rate * (1 + .2 * walk(90))) / SR
    pulses = unit(np.diff(np.floor(cycles), prepend=0))
    grit = unit(rng.standard_normal(N) * np.exp(-(cycles % 1) / .25))
    push = (pulses + .8 * grit) * undb(2 * walk(80))
    wall = 0
    for hz, width, mode_db in WALL_MODES:
        centre = np.full(N, float(hz))
        once = resonator(push, centre, width / hz)[0]
        wall = wall + undb(mode_db) * resonator(once, centre, width / hz)[0]
    uneven_pulses = pulses * undb(4 * walk(80))
    clicks = unit(colour(scatter(uneven_pulses, t60=.008, db=0), SKIN_SPECTRUM))
    active = (t > WALL_CREAK[0][0]) & (t < WALL_CREAK[-1][0])
    return (unit(wall) + undb(CREAK_CLICK_DB) * clicks) * undb(db) * active


def scene():
    """Superposition and reflection: all sounds meet at the box; its flaps and the fence add a faint tail."""
    peel, sizzle, tape_drag = tugs()
    rub, treble, hand_drag = slide_strokes()
    rustle, rustle_treble, rustle_drag = rustle_strokes()
    drag = np.sqrt(tape_drag ** 2 + hand_drag ** 2 + rustle_drag ** 2)
    film = tape(peel, sizzle) + snaps() + loose_tape(rustle, rustle_treble) + squeaks()
    box = scrapes() + thumps() + whips() + knocks() + hands(rub, treble) + board(drag) + creak()
    return (scatter(film + box, t60=.08, db=-18) + garden())[None]


def record(dry):
    """Band limiting and clipping: the microphone sheds deep bass, clips at full scale and cuts the top."""
    bass_cut = signal.butter(N=3, Wn=46, btype="high", fs=SR, output="sos")
    top_cut = signal.ellip(10, .2, 80, TOP_HZ, fs=SR, output="sos")
    thin = signal.sosfilt(bass_cut, dry)
    return signal.sosfilt(top_cut, np.clip(thin, -1, 1))


dry = scene()
out = record(dry)
master_out(out)
```